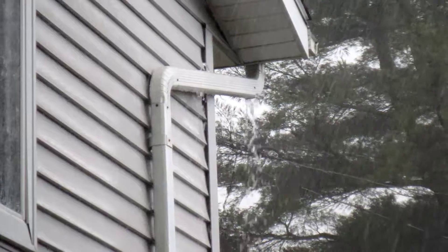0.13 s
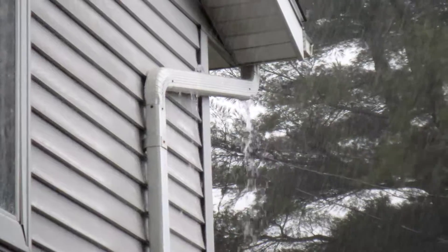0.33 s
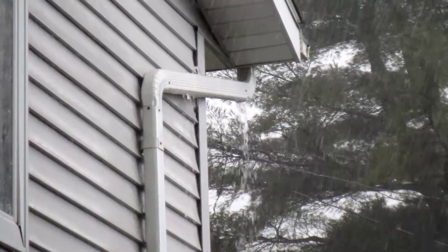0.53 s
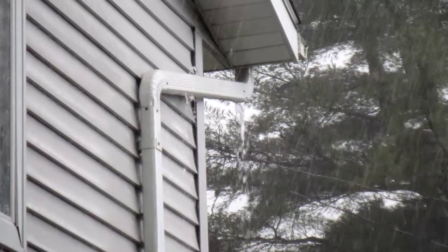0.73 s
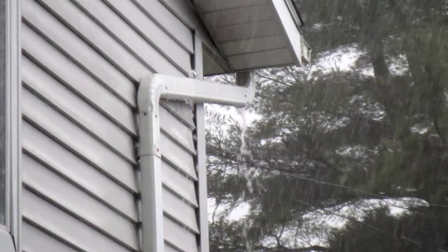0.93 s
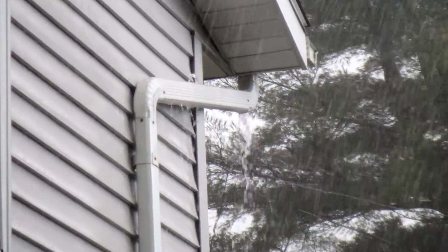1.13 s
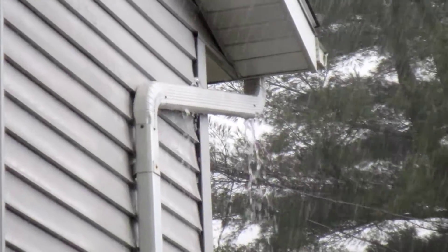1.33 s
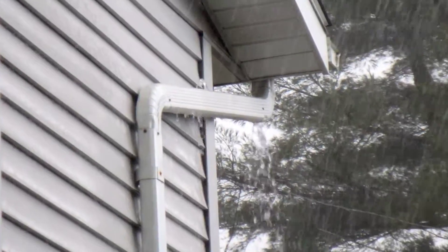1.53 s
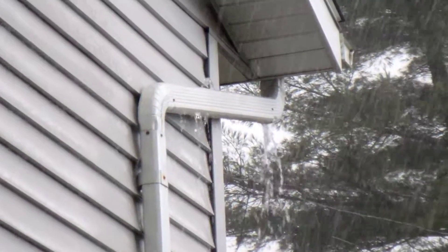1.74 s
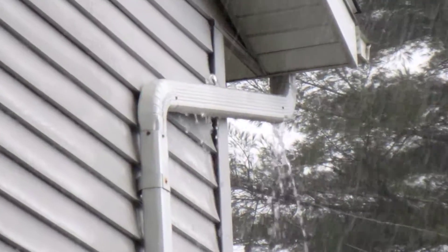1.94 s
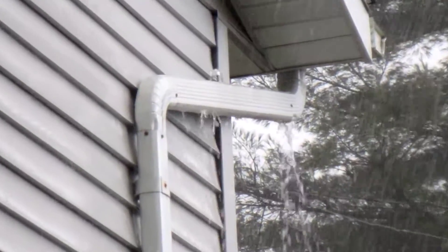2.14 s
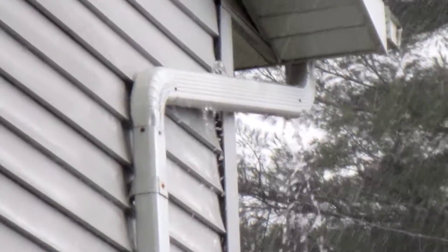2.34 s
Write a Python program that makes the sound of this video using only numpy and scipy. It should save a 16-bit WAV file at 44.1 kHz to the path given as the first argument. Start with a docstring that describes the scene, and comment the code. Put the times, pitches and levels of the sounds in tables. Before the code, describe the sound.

Heavy rain and spilling gutter water splash steadily close by, outside a house, a little hissier on the right for the first second. Fat drops knock near the microphone around 0.6 to 0.8 seconds; the rain dips, then creeps back, with faint taps at 1.2 and 1.7 seconds. Another knock comes at 2 seconds, then a very hard, sharp drop at 2.1 leaves the rain almost inaudible.

```python
"""Heavy rain and overflowing gutter water splash down beside a house, close to a hand-held camera.
The splashing is thousands of tiny impacts a second over a soft wash of distant ones. For about the
first second the rain sounds brighter and hissier on the right. A few fat drops knock on or next to
the camera. The loud ones make its automatic volume control turn the rain down, and the rain then
creeps back. One drop near the end strikes so hard that the rain almost vanishes."""
import sys
import numpy as np
from scipy import signal
from scipy.fft import rfft, irfft
from scipy.io import wavfile
from scipy.ndimage import minimum_filter1d

SR = 44100
rng = np.random.default_rng(int(sys.argv[2]) if len(sys.argv) > 2 else 0)


def int16_out(signal):
    """Quantize to a 16-bit WAV file."""
    q = np.round(np.clip(np.atleast_2d(signal).T, -1, 1) * 32767)
    wavfile.write(sys.argv[1], SR, q.astype(np.int16))


N = 105840
TIME, FREQUENCIES = np.arange(N) / SR, np.fft.rfftfreq(N, 1 / SR)

# Tone of the rain's early brightness (frequency [Hz], relative level [dB])
BRIGHTNESS_TONE = [(300, -24.5), (1300, -22), (2300, 2.5), (2800, -7), (3250, 2), (3900, -8), (4400, -28),
                   (6500, -15), (7500, -15.5), (9000, -9.5), (11000, -22.5), (13000, -38), (15000, -41),
                   (16500, -63)]
# How that brightness swells and dies away (time [s], level [dB])
BRIGHTNESS_LEVEL = [(.1, -29), (.62, -27.5), (.76, -26), (.9, -39), (1.2, -74)]
# How far its left wave runs ahead of its right (frequency [Hz], lead [radians])
BRIGHTNESS_LEFT_LEAD = [(2000, -0.5), (3500, 1.05), (4500, -1.6), (6500, -2), (11000, -1.5)]

# The fat drops; crack, splat and thud levels are relative to the ring (time [s], ring level [dB],
# ring pitch [Hz], time to fade by 60 dB [s], left over right [dB], crack [dB], splat [dB], thud [dB])
FAT_DROPS = [(.6203, -1, 2420, 0.0094, -9.5, -29, -12, -30), (.6655, -14.5, 1800, 0.0063, -8, -45, -1, -47),
             (0.6992, -11, 1700, 0.0041, -20, -45, -25, -37),
             (0.7711, -7.5, 1290, 0.015, -6.5, -55, -16, -55),
             (0.7763, 3, 1520, .006, -5.5, -55, -22.5, -49), (0.784, -1.5, 2170, 0.014, -4, -55, -2, -55),
             (0.7903, -0.5, 1280, 0.011, -7, -55, -9, -55), (0.7947, -6, 820, 0.011, -16.5, -55, -6, -50),
             (1.191, -13, 1640, 0.016, -.5, -40, -7, -45), (1.715, -16.5, 1580, .012, -4, -40, -12, -46.5),
             (2.0429, -8, 1420, 0.0026, -6, -38, -30, -26), (2.0455, 1, 1700, 0.0058, 3, -33, -19, -22),
             (2.0973, 23, 3406, 0.01, -3, -9, -29, -29.5), (2.2025, 0.5, 1570, 0.0063, 1, -35, -12, -40)]
# Tone of the brief crack as a hard knock overloads the recorder (frequency [Hz], relative level [dB])
CRACK_TONE = [(100, -30), (450, 0), (1200, 2), (3000, -11), (5000, -14), (9000, -9.5), (12500, -4),
              (16000, -15)]
# Tone of the drop bursting (frequency [Hz], relative level [dB])
SPLAT_TONE = [(40, -35), (100, -26), (170, -1.5), (500, -2.5), (1600, 6.5), (2600, -9), (4000, -39),
              (8000, -60), (15000, -73)]
# Notes of the camera's case (pitch [Hz], level relative to the ring [dB], time to fade by 60 dB [s])
CASE_NOTES = [(2530, -15, 0.033), (2755, -5, 0.0079), (3144, -15, 0.032), (3710, -40, 0.23),
              (4110, -33, 0.06)]

# Tone of rain splashing on the ground and the wall (frequency [Hz], relative level [dB])
RAIN_TONE = [(20, -58), (50, -40), (100, -18.5), (160, -19.5), (283, -13), (390, -15), (600, -5.5),
             (770, -5.5), (1030, -2.5), (1300, -3), (1800, -.5), (2150, -9), (2620, -7.5), (2950, -14.5),
             (3200, -8.5), (3900, -14.5), (4300, -19), (5200, -22), (6500, -17), (7400, -24), (8900, -24.5),
             (10200, -31.5), (14800, -40), (16300, -99)]
# How the rain swells and eases (time [s], level [dB])
RAIN_LEVEL = [(.1, -23.5), (.6, -22.5), (.9, -20), (1.149, -20.5), (1.35, -20), (1.6, -21), (1.78, -20.5),
              (1.92, -22.3), (2, -20.5), (2.15, -19)]
# How alike the rain is on the left and right (frequency [Hz], likeness [0 to 1])
RAIN_LIKENESS = [(30, 1), (200, 0.98), (600, .99), (1600, 0.97), (2300, 0.66), (2700, 0.88), (3500, 0.4),
                 (3900, 0.57), (4700, 0.15), (8000, 0.23), (11000, .58), (14000, 0.17)]
# How far the rain's left wave runs ahead of its right (frequency [Hz], lead [radians])
RAIN_LEFT_LEAD = [(100, 0), (500, -.08), (1200, -.18), (2000, -.45), (2600, .3), (3500, -.4), (4000, .8),
                  (7000, .9), (9000, 2.3), (13000, 2.3)]
# Which side the rain is louder on (frequency [Hz], left over right [dB])
RAIN_BALANCE = [(100, -1.5), (700, -0.5), (1700, -2), (2600, 2), (3200, 0), (4500, 4.5), (6400, 0.5),
                (8500, 4), (13000, 0)]

# Narrow bands the camera filters out to hide its zoom motor's whine
# (frequency [Hz], width of one filter pass [Hz])
CAMERA_NOTCHES = [(2050, 30), (3060, 58), (4110, 65), (5120, 56), (6140, 49)]


def gain(db):
    """Turns decibels into a number to multiply a sound by."""
    return 10 ** (np.asarray(db) / 20)


def unit_power(sound):
    """Scales a sound so that its average power is 1."""
    return sound / np.sqrt(np.mean(sound ** 2) + 1e-20)


def over_frequency(table):
    """Joins a table's points into a curve over all frequencies, spaced like musical pitch."""
    hz, value = np.transpose(table)
    return np.interp(np.log(FREQUENCIES + 1), np.log(hz + 1), value)


def side_gains(balance_db):
    """Left and right gains; a positive balance makes the left louder."""
    return gain(np.array([[.5], [-.5]]) * balance_db)


def tone_filter(curve_db):
    """A filter with this tone that rings only after each click, as a struck surface does."""
    log_gain = np.fft.fft(irfft(np.log(gain(curve_db)))).real
    return np.exp(np.conj(signal.hilbert(log_gain)))[:len(curve_db)]


def noise_puff(tone, shape):
    """A puff of noise that follows a loudness shape and rings with the given tone."""
    ringing = irfft(tone_filter(over_frequency(tone)[::20]))
    noise = shape * rng.standard_normal(len(shape))
    return signal.fftconvolve(noise, ringing / np.linalg.norm(ringing))[:len(shape)]


def patter_spectrum(drops_per_s=5000, size_spread_db=3.2, wash_share=0.44):
    """The spectrum of countless nearby impacts, a few of them large, over the blur of distant ones."""
    sizes = gain(size_spread_db * np.minimum(rng.exponential(1, N), 5))
    signs = rng.choice([-1, 1], N)
    lands = rng.random(N) < drops_per_s / SR
    near = unit_power(sizes * signs * lands)
    distant = rng.standard_normal(N)
    return rfft(np.sqrt(1 - wash_share) * near + np.sqrt(wash_share) * distant)


def splashing(tone, level, likeness, left_lead, balance_db, flurry_db=0.6):
    """Drop impacts with the given tone reach both sides of the microphone in flurries."""
    left = patter_spectrum()
    right = likeness * left + np.sqrt(1 - likeness ** 2) * patter_spectrum()
    right *= np.exp(-1j * over_frequency(left_lead))
    stereo = np.array([left, right]) * side_gains(balance_db)
    splashes = irfft(stereo * tone_filter(over_frequency(tone)), N)
    # Slow noise, mostly below 30 Hz, makes the loudness waver.
    flurries = unit_power(irfft(rfft(rng.standard_normal(N)) * np.exp(-FREQUENCIES / 30), N))
    level_db = np.interp(TIME, *np.transpose(level))
    return unit_power(splashes) * gain(level_db + flurry_db * flurries)


def early_brightness():
    """The rain sounds brighter and hissier on the right for about the first second."""
    return splashing(BRIGHTNESS_TONE, BRIGHTNESS_LEVEL, likeness=0.78,
                     left_lead=BRIGHTNESS_LEFT_LEAD, balance_db=-5.5)


def fat_drop(level_db, ring_hz, ring_fade_s, balance_db, crack_db, splat_db, thud_db):
    """A fat drop hits: a short ring, an overload crack, a splat, a low push and a faint ringing case."""
    ring_rise_s, crack_s, thud_s = 0.0004, 0.002, 0.00042
    splat_rise_s, splat_fade_s = 0.00064, 0.026
    t = TIME[TIME < .09]
    ring_shape = (1 - np.exp(-(t / ring_rise_s) ** 2)) * gain(-60 * t / ring_fade_s)
    ring = ring_shape / ring_shape.max() * np.sin(2 * np.pi * ring_hz * t)
    crack_shape = np.exp(-(t / crack_s) ** 2)
    crack = gain(crack_db) * np.array([noise_puff(CRACK_TONE, crack_shape) for side in "LR"])
    splat_shape = np.minimum(t / splat_rise_s, 1) * gain(splat_db - 60 * t / splat_fade_s)
    splat = noise_puff(SPLAT_TONE, splat_shape)
    thud = gain(thud_db) * t / thud_s * np.exp(1 - t / thud_s)
    case = sum(gain(db - 60 * t / fade_s) * np.sin(2 * np.pi * hz * t) for hz, db, fade_s in CASE_NOTES)
    case *= 1 - np.exp(-(t / splat_rise_s) ** 2)
    return gain(level_db) * side_gains(balance_db) * (ring + crack + splat + thud + case)


def rain():
    """The downpour and the water spilling from the gutter splash on the ground and the wall."""
    return splashing(RAIN_TONE, RAIN_LEVEL, likeness=over_frequency(RAIN_LIKENESS),
                     left_lead=RAIN_LEFT_LEAD, balance_db=over_frequency(RAIN_BALANCE))


def scene():
    """Mixes the rain and its early brightness, then adds each fat drop at its time."""
    mix = rain() + early_brightness()
    for start_s, *settings in FAT_DROPS:
        knock = fat_drop(*settings)
        slot = mix[:, round(start_s * SR):][:, :knock.shape[1]]
        slot += knock[:, :slot.shape[1]]
    return mix


def volume_control(sound, limit_db=-5, hold_s=0.089, recover_db_per_s=12.5):
    """Turns the sound down quickly at any peak over the limit, waits, then slowly turns it back up."""
    react_s, look_ahead_s = 0.00046, 0.0003
    peak_db = 20 * np.log10(abs(sound).max(0) + 1e-9)
    excess_db = np.maximum(peak_db - limit_db, 0)
    hold = int(hold_s * SR)
    # Keep the largest excess of the last hold_s seconds.
    held_db = -minimum_filter1d(-excess_db, hold, origin=(hold - 1) // 2, mode="constant")
    recovery_db = recover_db_per_s * TIME
    cut_db = np.maximum.accumulate(held_db + recovery_db) - recovery_db
    smoothing = np.exp(-1 / (react_s * SR))
    smooth_cut_db = signal.lfilter([1 - smoothing], [1, -smoothing], cut_db)
    return sound * gain(-np.interp(TIME + look_ahead_s, TIME, smooth_cut_db))


def record(dry):
    """The camera cuts narrow bands, fades in, controls the volume, flattens peaks and trims the top."""
    silent_s, fade_in_s, ceiling, highest_hz = 0.089, 0.019, 0.65, 16700
    for hz, width_hz in CAMERA_NOTCHES + CAMERA_NOTCHES:  # twice, for steep sides
        dry = signal.lfilter(*signal.iirnotch(hz, hz / width_hz, SR), dry)
    fade_in = np.clip((TIME - silent_s) / fade_in_s, 0, 1)
    flattened = np.clip(volume_control(dry * fade_in), -ceiling, ceiling)
    treble_cut = signal.firwin(401, highest_hz, window=("kaiser", 9), fs=SR)
    return signal.oaconvolve(flattened, treble_cut[None], "same", axes=1)


dry = scene()
out = record(dry)
int16_out(out)
```